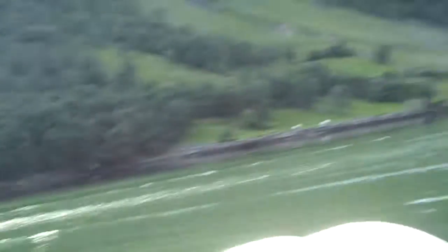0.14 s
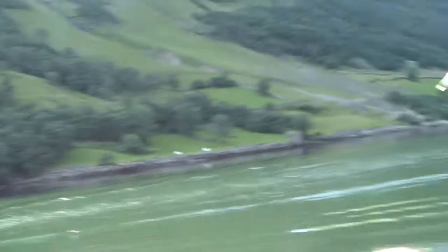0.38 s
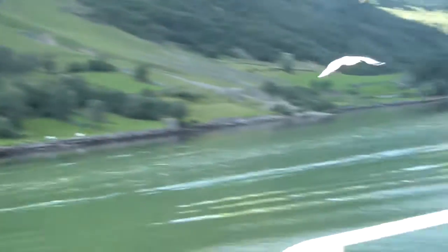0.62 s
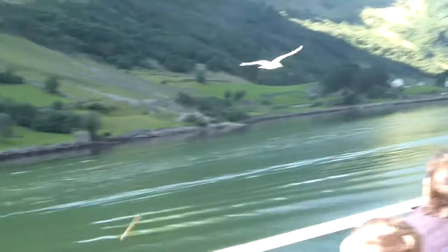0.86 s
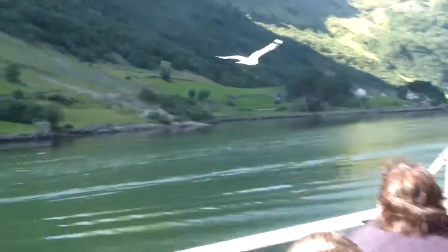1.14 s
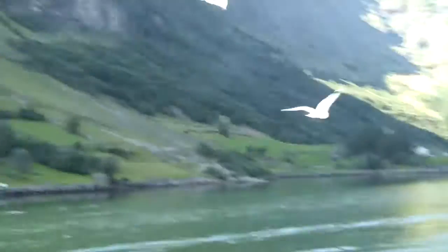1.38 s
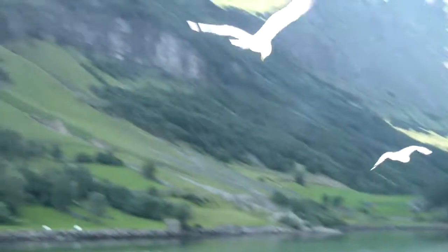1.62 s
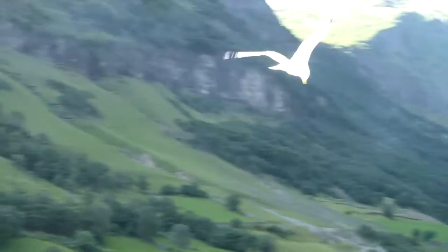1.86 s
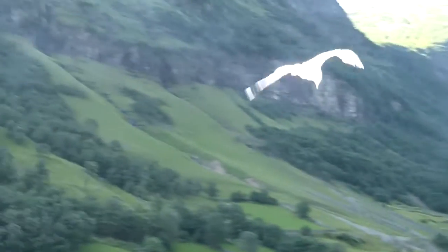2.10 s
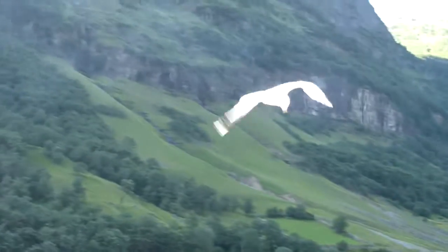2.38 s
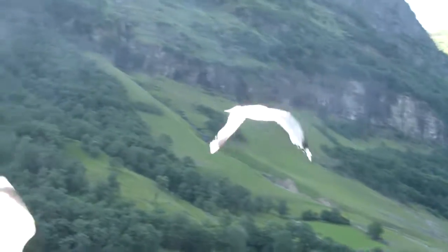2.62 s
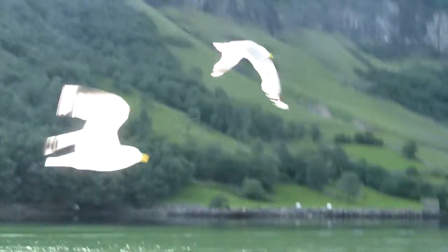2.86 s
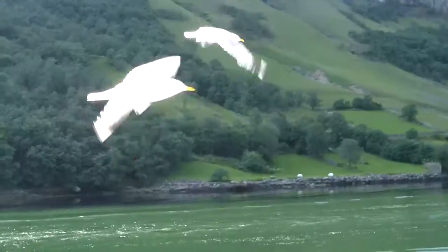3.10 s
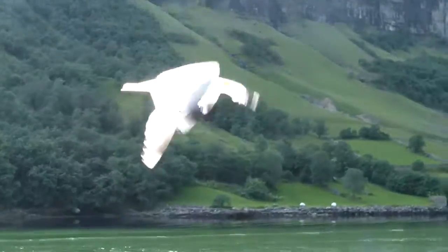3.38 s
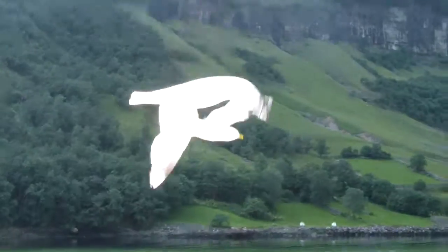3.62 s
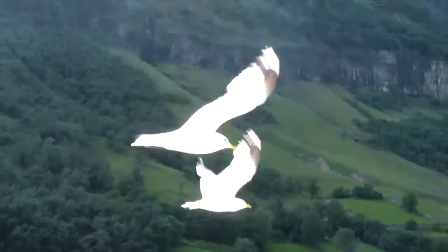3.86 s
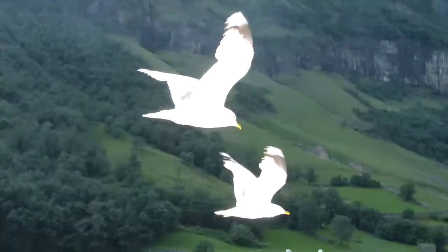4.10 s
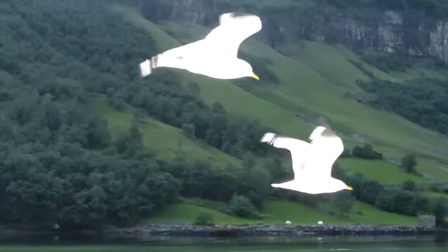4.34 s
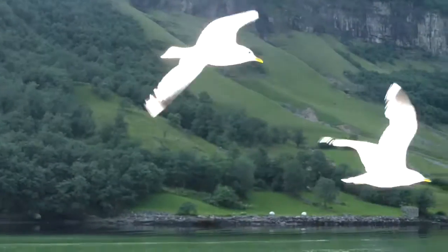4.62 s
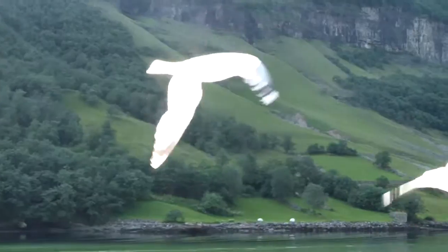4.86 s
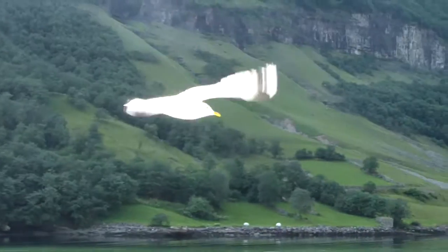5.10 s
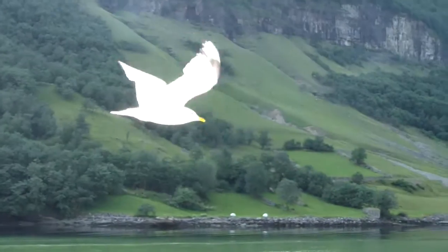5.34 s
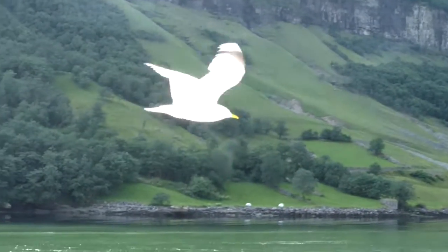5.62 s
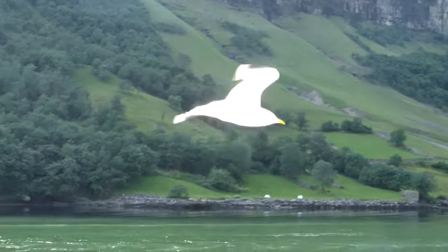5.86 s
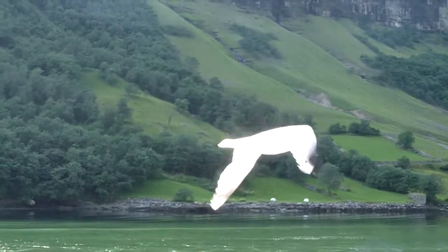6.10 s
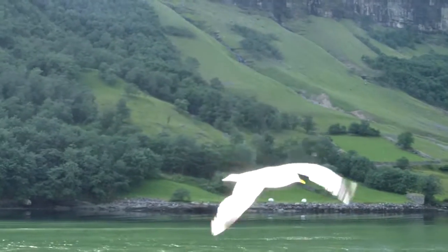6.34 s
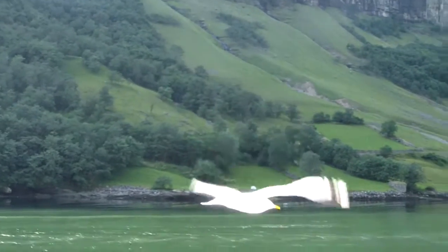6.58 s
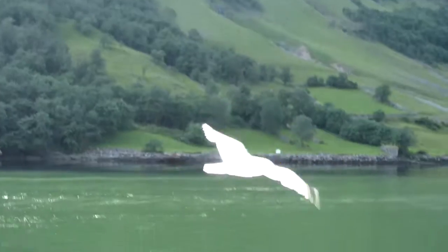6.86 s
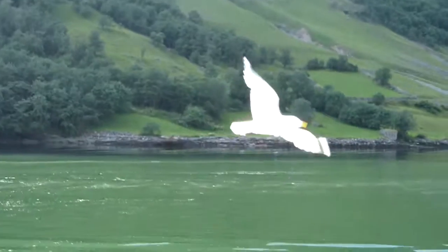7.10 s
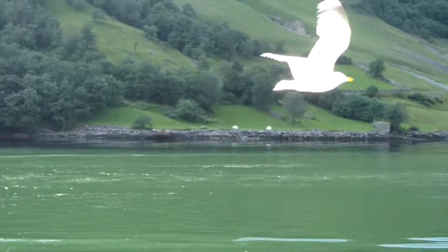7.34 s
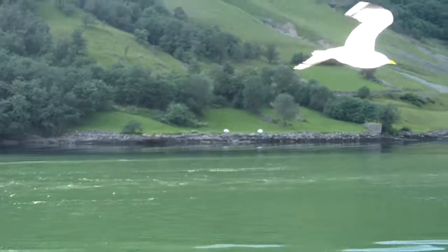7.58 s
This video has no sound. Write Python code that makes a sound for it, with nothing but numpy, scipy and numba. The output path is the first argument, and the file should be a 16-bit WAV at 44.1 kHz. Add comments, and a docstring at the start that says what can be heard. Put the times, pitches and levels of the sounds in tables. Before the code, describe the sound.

On the open deck of a moving boat, a diesel exhaust drones low and steady, slightly to the left, with a muffled mechanical roar around it. Wind hits the unprotected stereo microphone: rumble and rapid flutter at first, a lull near two seconds, then strong gusts between three and five. Dull pops push the level down briefly. A faint wake hiss slowly grows.

```python
"""A diesel's exhaust drones on the open deck of a moving ship, while wind buffets two microphone ports.
Drone: sines at engine orders. Casing, pipes, intake and whine: noise through resonances, over a broad roar.
Wake: bright, slowly growing hiss. Wind: deep rumble, lumpy breeze, bursts of flutter and single pops,
each port in its own way. A fast limiter ducks everything after each peak."""
import sys
import numpy as np
from scipy import signal
from scipy.fft import rfft, irfft
from scipy.io import wavfile
from scipy.ndimage import uniform_filter1d
from numba import njit

SR = 44100
rng = np.random.default_rng(int(sys.argv[2]) if len(sys.argv) > 2 else 0)


def invert_db(x):
    """Field ratio 10**(x/20) for x, a level in decibels (scalar or array-like)."""
    u = np.asarray(x, float) / 20
    return 10 ** u


def dump(signal):
    """Clip the signal to [-1, 1] and save it as 16-bit WAV at the path in sys.argv[1]."""
    limited = np.clip(np.atleast_2d(signal).T, -1, 1)
    pcm = np.round(limited * 32767).astype(np.int16)
    wavfile.write(sys.argv[1], SR, pcm)


N = 340452
TIME_S = np.arange(N) / SR


def in_time(rows):
    """Columns of a table, joined by straight lines at every sample."""
    s, *columns = np.transpose(rows)
    return [np.interp(TIME_S, s, column) for column in columns]


def rms_one(x):
    """Scale to rms 1."""
    return x / np.sqrt(np.mean(x ** 2) + 1e-20)


def coloured(spectrum, channels):
    """Noise of rms 1 with a spectrum given as (Hz, relative dB per Hz), straight over log frequency."""
    hz = np.maximum(np.fft.rfftfreq(N, 1 / SR), 1)
    point_hz, point_db = np.transpose(spectrum)
    shape_db = np.interp(np.log(hz), np.log(point_hz), point_db, left=-80, right=-120)
    white = rng.standard_normal((channels, N))
    return rms_one(irfft(rfft(white) * invert_db(shape_db), N))


def drift(rate_hz, channels):
    """Low-passed chance of rms 1: two equal poles at rate_hz, the first second dropped to settle."""
    r = np.exp(-2 * np.pi * rate_hz / SR)
    chance = rng.standard_normal((channels, N + SR))
    return rms_one(signal.lfilter([1], [1, -2 * r, r * r], chance)[:, SR:])


def resonance(x, hz, width_hz):
    """Two-pole band-pass, gain 1 on top."""
    r = np.exp(-np.pi * width_hz / SR)
    zeros = [(1 - r * r) / 2, 0, (r * r - 1) / 2]
    poles = [1, -2 * r * np.cos(2 * np.pi * hz / SR), r * r]
    return signal.lfilter(zeros, poles, x)


def ringing(white, modes):
    """Noise twice through each resonance (Hz, single-pass width Hz, relative dB); sum of rms 1."""
    ring = 0
    for hz, width_hz, db in modes:
        once = resonance(white, hz, width_hz)
        ring = ring + invert_db(db) * resonance(once, hz, width_hz)
    return rms_one(ring)


def cut(x, hz, kind, order):
    """Butterworth low- or high-pass."""
    return signal.sosfilt(signal.butter(order, hz, kind, fs=SR, output="sos"), x)


def spread(pair, alike):
    """Left and right from a shared and an opposed noise; alike is their correlation."""
    alike = np.clip(alike, 0, 1)
    shared = np.sqrt((1 + alike) / 2) * pair[0]
    opposed = np.sqrt((1 - alike) / 2) * pair[1] * [[1], [-1]]
    return shared + opposed


def pan_gain(left_over_right_db):
    """Gains that set left against right, half up and half down."""
    return invert_db([[left_over_right_db / 2], [-left_over_right_db / 2]])


def fading(db, from_s, db_per_s):
    """A level that holds, then sinks steadily."""
    return db - db_per_s * np.maximum(TIME_S - from_s, 0)


def evened(x, window_ms):
    """Noise with its own level swings divided out."""
    power = uniform_filter1d(x ** 2, int(window_ms * SR / 1000))
    return rms_one(x / np.sqrt(power + 1e-3))


def wake():
    """Foam along the hull: bright, wide, slightly splashy hiss that slowly grows."""
    # Each row: frequency in Hz, relative level in dB per Hz.
    foam_spectrum = [(1500, -4), (4000, -1), (8000, 0), (12000, -4), (16000, -9)]
    start_db, rise_db_per_s = -57, 1.12
    splash_db = 1.3 * drift(45, channels=1)
    wake_db = start_db + rise_db_per_s * TIME_S + splash_db
    return invert_db(wake_db) * spread(coloured(foam_spectrum, channels=2), 0.1) * pan_gain(2.4)


def rumble(swing_db):
    """Deep turbulence on the ports, following about half of the wind's swing in dB."""
    mean_wind_db, follows = -16.5, 0.54
    low = coloured([(8, 16.5), (22, 14.5), (42, 10.5), (72, 2.5), (125, -8.0), (250, -22), (700, -66)],
                   channels=2)
    own_db = 3.4 * drift(9.3, channels=2)
    shared_db = 3.3 * drift(3, channels=1)
    rumble_db = mean_wind_db + follows * swing_db + own_db + shared_db
    return invert_db(rumble_db) * spread(low, 0.59) * pan_gain(7)


def breeze(swing_db):
    """Lumpy turbulence above the rumble, independent on each port."""
    mean_wind_db, follows = -25.5, 0.81
    turbulence = coloured([(60, -8.5), (160, -0.5), (360, -13.0), (720, -25.0), (1500, -57), (3000, -68)],
                          channels=2)
    breeze_db = mean_wind_db + follows * swing_db + 3.7 * drift(39, channels=2)
    return invert_db(breeze_db) * turbulence * pan_gain(3.2)


def weak_gusts(swing_db):
    """Bursts at random times, their level following the wind; columns as for the strong ones."""
    count, mean_wind_db, spread_db = 70, -32, 2.5
    median_ms, mean_pan_db = 10.7, 8
    when_s = rng.random(count) * TIME_S[-1]
    chance = rng.standard_normal((count, 3))
    level_db = mean_wind_db + np.interp(when_s, TIME_S, swing_db) + spread_db * chance[:, 0]
    length_ms = median_ms * np.exp(chance[:, 1] / 2)
    pan_db = mean_pan_db * (1 + chance[:, 2])
    return np.transpose([when_s, level_db, length_ms, pan_db])


def gusts(swing_db):
    """Bursts of lumpy flutter, own noise on each port, brighter when stronger."""
    # Each row: centre in seconds, strength in dB before colouring, power width at 1/e in ms,
    # left over right strength in dB.
    strong_gusts = [(0.041, -16.5, 21, 4), (0.11, -23, 20, 5), (0.173, -13, 6, 3), (0.205, -17.5, 19, 1),
                    (0.277, -19, 37, 4), (0.369, -20.5, 28, -0.5), (0.581, -15.5, 9.8, 3),
                    (1.202, -25, 8.5, 10), (2.516, -19, 9.9, 18), (2.91, -23, 40, 11), (3.11, -23.5, 98, 6),
                    (3.167, -13, 8, 0.5), (3.328, -18, 20, 3), (3.46, -20.5, 64, -2.5),
                    (3.579, -17.5, 4, -5), (3.864, -19.5, 15, 7), (3.924, -15.5, 3.4, 10),
                    (4.192, -21, 28, 0), (4.232, -18.5, 8.6, -5), (4.26, -17.5, 22, 3),
                    (4.308, -15.5, 47, -0.5), (4.412, -15.5, 32, 5.5), (4.475, -21, 54, 6),
                    (4.525, -14, 38, -0.5), (4.612, -15.5, 5.6, -4.5), (4.679, -14.5, 7, 4.5),
                    (5.824, -23.5, 40, 6), (6.075, -23.5, 68, 0), (6.505, -21, 23, 7),
                    (6.82, -27.5, 87, -2.5), (7.078, -18.5, 26, -0.5), (7.148, -24, 22, 5)]
    power = np.zeros((2, N))
    for s, db, length_ms, pan_db in [*strong_gusts, *weak_gusts(swing_db)]:
        near = slice(max(round((s - .1) * SR), 0), round((s + .1) * SR))
        swell = np.exp(-np.abs((TIME_S[near] - s) * 2000 / length_ms) ** 3)
        port_power = invert_db([db + pan_db / 4, db - 3 * pan_db / 4]) ** 2
        power[:, near] += np.outer(port_power, swell)
    strength = np.sqrt(power) * invert_db(2.0 * drift(95, channels=2))
    dull = coloured([(40, -15.0), (160, -13), (420, -20.5), (820, -32.0), (2000, -69), (4000, -62)],
                    channels=2)
    bright = coloured([(200, 3.0), (520, 5.5), (950, -7.5), (1400, -14.0), (2200, -34.0), (6000, -65)],
                      channels=2)
    dull_flutter = invert_db(5.0) * strength * dull
    bright_flutter = invert_db(6.5) * strength ** 1.5 * evened(bright, window_ms=4.3)
    return dull_flutter + bright_flutter


def pops():
    """A single eddy pushes the ports, then pulls back more gently."""
    # Each row: time in seconds, left push, right push (relative, signed), width in ms.
    eddies = [(0.049, 0.55, 0.96, 2.3), (0.794, -2.7, 0.43, 3.1), (0.884, -2.3, -0.18, 3),
              (1.207, -1.6, 0.18, 3.9), (2.751, -0.85, -0.46, 2.1), (2.963, 1, -0.6, 2.2),
              (3.444, -0.28, 0.12, 4.4), (4.229, -1.7, 1, 2.1), (4.406, -1.4, -0.26, 2.2),
              (4.805, -2.2, 0.9, 2.1), (5.308, 0.2, -0.6, 1.2), (6.347, -1.7, -0.04, 5.6),
              (6.877, -1.96, 0.4, 1.67)]
    out, near = np.zeros((2, N)), np.arange(-1500, 1500)
    for s, left, right, width_ms in eddies:
        widths = near * 1000 / SR / width_ms
        push = np.exp(-(1.7 * widths) ** 2)
        pull = .3 * np.exp(-(widths / 1.5 - 1) ** 2)
        out[:, round(s * SR) + near] += np.outer([left, right], push - pull)
    return out


def wind():
    """Turbulence on the ports: rumble, breeze, bursts and pops; all but the pops use the wind's swing."""
    # Each row: time in seconds, wind strength in dB (only its swing about the mean counts).
    wind_strength = [(0, -28), (.5, -27.5), (1.25, -29), (1.45, -41), (2.0, -42), (2.15, -34), (3.2, -25),
                     (3.9, -31), (4.5, -22.5), (5.1, -33.5), (5.4, -25.5), (6.4, -29.5), (6.7, -34),
                     (7.1, -25), (7.45, -36.5), (7.72, -15)]
    strength_db = in_time(wind_strength)[0]
    swing_db = strength_db - strength_db.mean()
    return rumble(swing_db) + breeze(swing_db) + gusts(swing_db) + pops()


def whine(white):
    """The turbine's whine: noise through one narrow resonance, equal on both sides, fading."""
    whine_db = fading(-71, from_s=0.79, db_per_s=2)
    return invert_db(whine_db) * ringing(white[0], [(9057, 30, 0)])


def intake(white):
    """Intake hiss: noise through one wide resonance, its level flickering."""
    # Each row: time in seconds, relative level in dB.
    intake_level = [(0, -50.5), (.9, -58), (1.4, -53), (1.9, -54), (2.4, -67), (3.2, -56.5), (7.72, -81)]
    hiss = ringing(white, [(5220, 1950, 0)])
    intake_db = in_time(intake_level)[0] + 3.8 * drift(38, channels=1)
    return invert_db(intake_db) * spread(hiss, 0.41) * pan_gain(-3)


def casing_and_pipes(white):
    """Combustion noise rings in casing and pipes over a broad roar."""
    # Each row: frequency in Hz, single-pass width in Hz, relative level in dB.
    casing_modes = [(1097, 102, 7), (1272, 115, 9.5), (2004, 150, -0.5), (2142, 56, 3)]
    # Low resonances, each row: frequency in Hz, single-pass width in Hz, relative level in dB.
    pipe_modes = [(327.8, 42, -3), (760, 43, -17)]
    # Each row: frequency in Hz, relative level in dB per Hz.
    roar_spectrum = [(60, 1), (250, -1.5), (450, -11), (900, -14), (1600, -17), (2400, -16), (3400, -23.5),
                     (4600, -31.5), (9000, -43.5), (16000, -62)]
    casing_db, roar_over_casing_db = -44, 9
    ring = invert_db(3.2 * drift(1.5, channels=1)) * ringing(white, casing_modes)
    casing = ring + invert_db(roar_over_casing_db) * coloured(roar_spectrum, channels=2)
    pipes_db = fading(-35.5, from_s=3.1, db_per_s=1.5)
    pipes = invert_db(pipes_db) * ringing(white, pipe_modes)
    body = invert_db(casing_db + 1.5 * drift(31.0, channels=1)) * casing + pipes
    return spread(body, 0.93)


def roar():
    """One white noise excites casing, pipes, intake and whine alike."""
    white = rng.standard_normal((2, N))
    return casing_and_pipes(white) + intake(white) + whine(white)


def drone():
    """Exhaust orders as sines sharing one trough; two slow level wavers alternate among them."""
    # Each row: multiple of the engine cycle, relative level in dB.
    order_levels = [(1, -9), (2, 4.5), (4, -9), (5, -24), (6, -21.5), (8, 1), (10, -17.5), (12, -2.5),
                    (14, -10.5), (20, -21), (22, -26.5)]
    # The engine speed drifts a hair. Each row: time in seconds, trough within the cycle in ms.
    crank = [(0, 9.75), (3.3, 11.83), (7.72, 10.26)]
    cycle_hz, drone_db = 14.415, -17
    trough_s = in_time(crank)[0] / 1000
    angle = 2 * np.pi * cycle_hz * (TIME_S - trough_s)
    waver = drift(5.5, channels=2)
    out = np.zeros(N)
    for i, (order, db) in enumerate(order_levels):
        level_db = drone_db + db + 1.2 * waver[i % 2]
        out -= invert_db(level_db) * np.cos(order * angle)
    return out


def scene():
    """The engine leans to the left; wake and wind are all round."""
    engine = (drone() + roar()) * pan_gain(4)
    return engine + wake() + wind()


@njit
def follow(level_db, attack, release_db, knee_db):
    """Rises quickly with a peak, sinks back the faster the higher it went."""
    out, held = np.empty_like(level_db), 0.
    for i in range(len(level_db)):
        if level_db[i] > held:
            held = held + attack * (level_db[i] - held)
        else:
            held = held - release_db * (1 + held / knee_db)
        out[i] = held
    return out


def limiter(x, threshold_db, slope, attack_ms, release_db_per_s, knee_db):
    """One gain for both channels, pulled down by the louder; it moves in small stairs, which tick on fast falls."""
    steps_per_s = 2000
    peak_db = 20 * np.log10(np.abs(x).max(axis=0) + 1e-9)
    over_db = np.maximum(peak_db - threshold_db, 0)
    attack = 1 - np.exp(-1000 / (attack_ms * SR))
    held_db = follow(over_db, attack, release_db_per_s / SR, knee_db)
    stairs = (np.arange(N) * steps_per_s // SR * SR // steps_per_s).astype(int)
    return x * invert_db(-slope * np.maximum(held_db[stairs], 0))


def band_limit(x):
    """A steep low-pass at the top of the band."""
    return signal.sosfilt(signal.butter(12, 15780, fs=SR, output="sos"), x)


def record(dry):
    """The microphones lose the deepest bass, which also leads the lowest orders; then limiter and band edges."""
    left_db, right_db = 4, 2.5
    heard = invert_db([[left_db], [right_db]]) * cut(dry, 27, "high", order=2)
    limited = limiter(heard, threshold_db=-7.5, slope=0.98, attack_ms=2.76, release_db_per_s=64, knee_db=9.0)
    banded = cut(cut(limited, 4, "high", order=1), 15600, "low", order=12)
    return band_limit(np.clip(banded, -1, 1))


dry = scene()
out = record(dry)
dump(out)
```